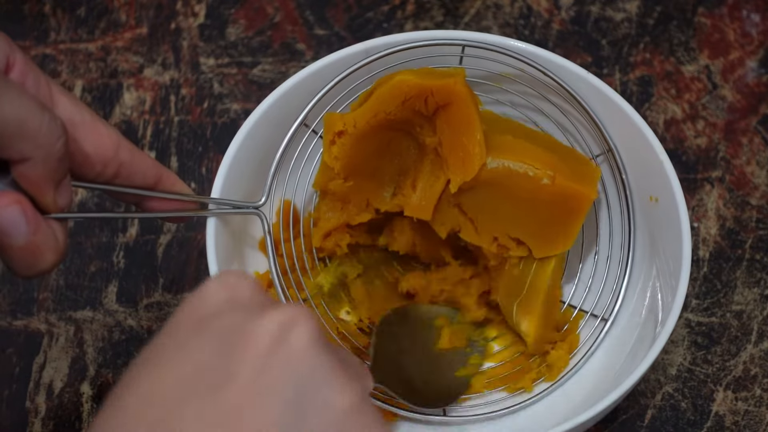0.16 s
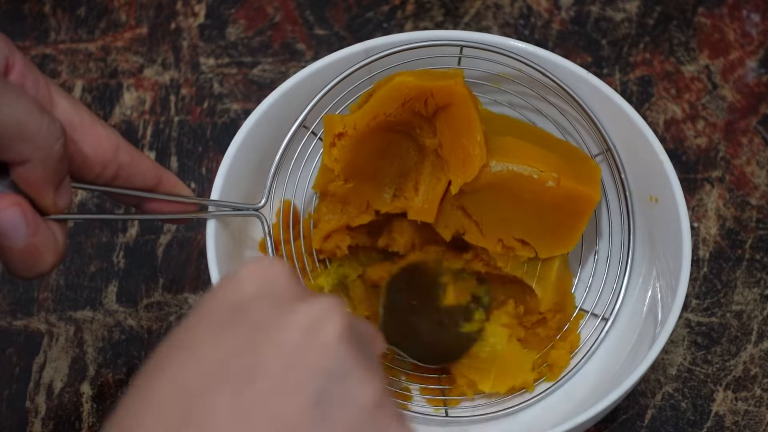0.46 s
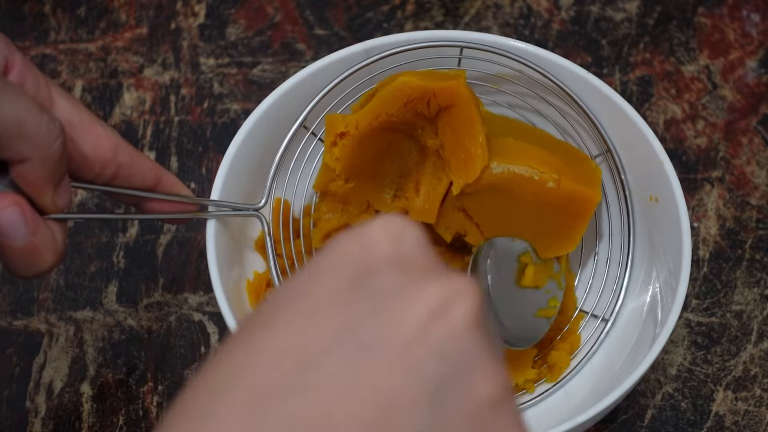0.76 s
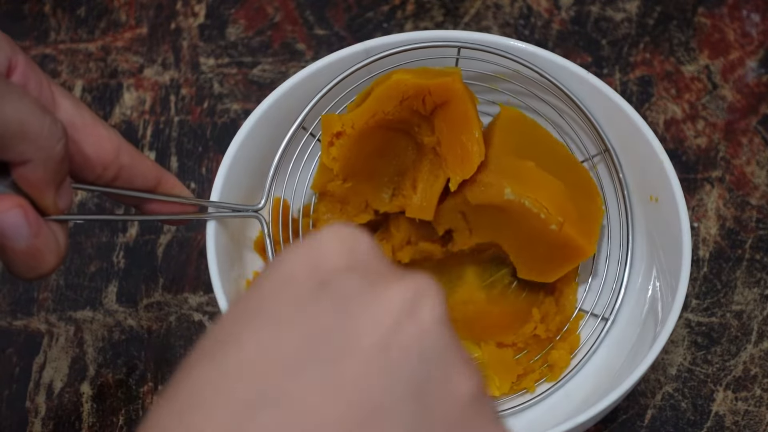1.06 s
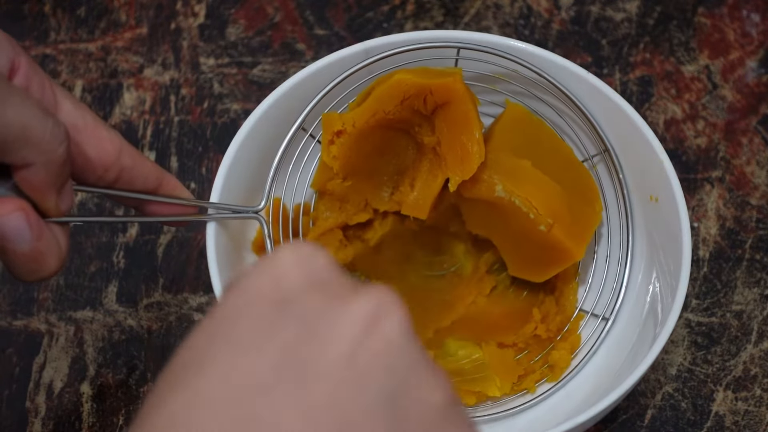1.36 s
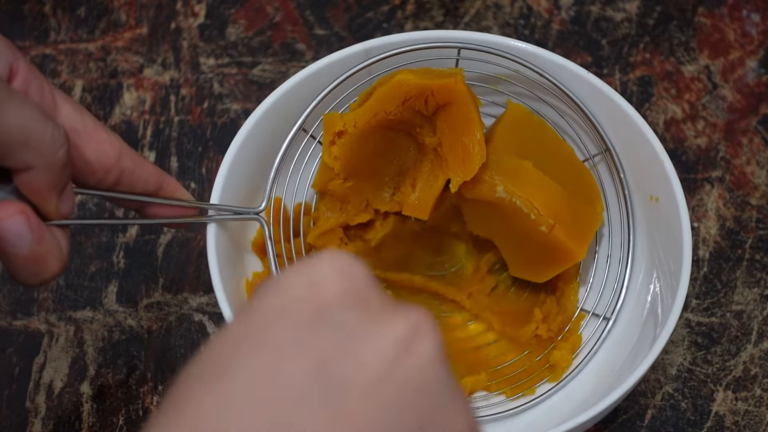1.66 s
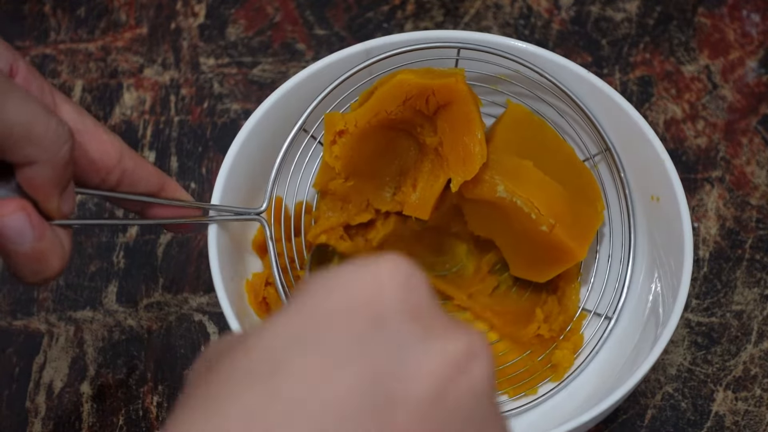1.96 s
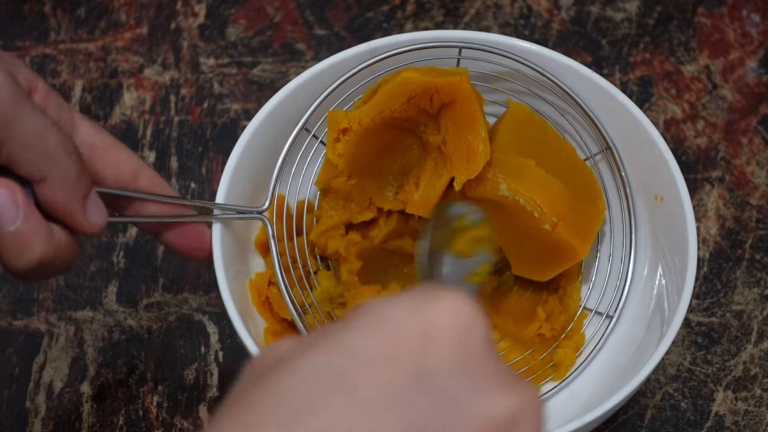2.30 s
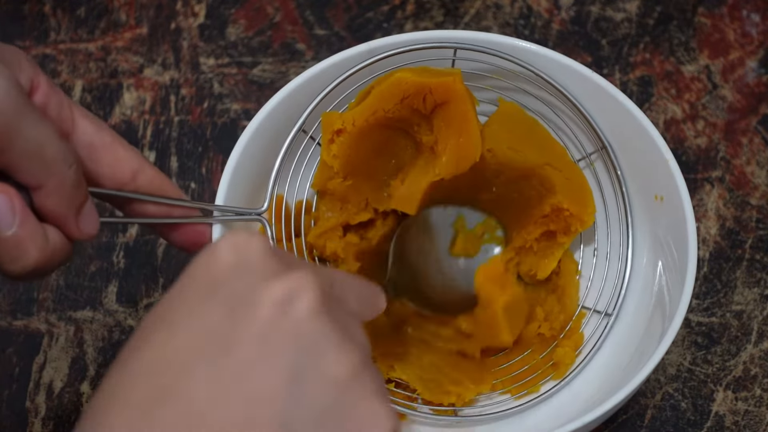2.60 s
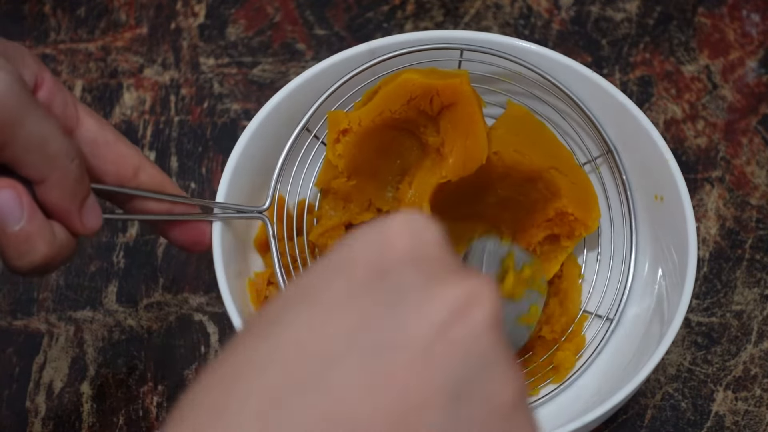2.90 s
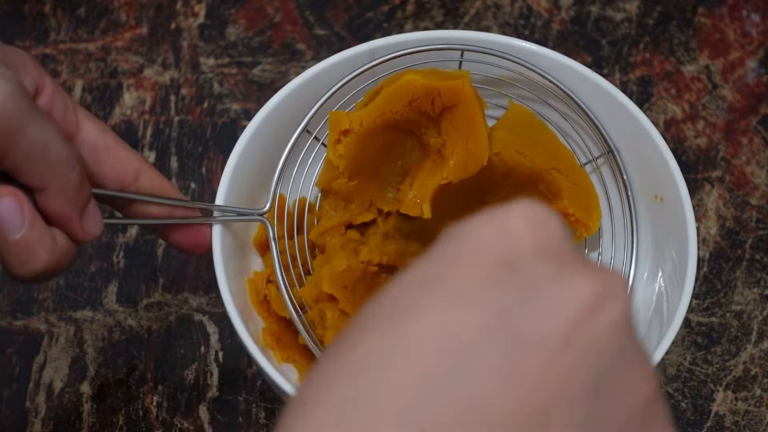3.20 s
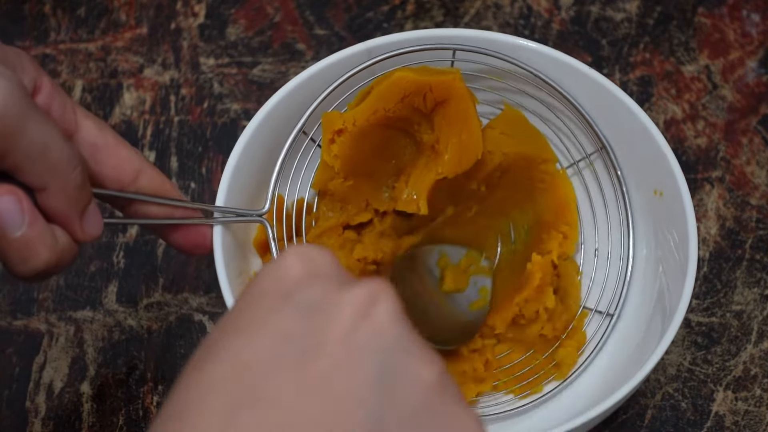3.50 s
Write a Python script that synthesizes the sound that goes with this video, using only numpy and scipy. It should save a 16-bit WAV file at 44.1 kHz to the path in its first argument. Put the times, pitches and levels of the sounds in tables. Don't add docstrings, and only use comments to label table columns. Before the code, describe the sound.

Spoon strokes scrape wires and wet pulp in irregular rhythm, with tiny ticks and short metallic pings. Clusters of hard clacks on the glazed bowl come mid-way, fading to softer rubs; close microphone in a lively small kitchen.

```python
import sys
import numpy as np
from scipy import signal
from scipy.io import wavfile

SR = 44100
rng = np.random.default_rng(int(sys.argv[2]) if len(sys.argv) > 2 else 0)


def ratio(d):
    e = np.asarray(d, float) / 20
    return 10 ** e


def unload_wav(signal):
    wavfile.write(
        sys.argv[1],
        SR,
        np.round(np.clip(np.atleast_2d(signal).T, -1, 1) * 32767).astype(np.int16),
    )


N = 160965

# (time [s], peak [dB], clack and bowl ring [dB], body [dB], crack centre [Hz])
KNOCK_HITS = [(1.271, -24.5, 6, -14, 4730), (1.5508, -17, 11, -2, 7000), (1.5533, -17, 3, -1.5, 9000),
              (1.556, -14.5, -6, -26, 4000), (1.566, -23, -1, -4, 3800), (1.57, -22, 2, -22, 5460),
              (1.589, -23.5, 0, -21, 6500), (1.598, -24, -5, -9, 3550), (1.835, -19, 0, -19, 6300),
              (1.844, -24, -21, -1, 4400), (1.85, -21.5, -7, -5, 6300), (1.855, -23, -4, -3, 4000),
              (1.86, -17, 4, -20, 5200), (1.868, -30, -13, -8, 4500), (1.878, -30.5, -4, -6, 4020),
              (1.986, -42.5, 1, 5.5, 3000), (2.123, -32, -19, -7, 6530), (2.1266, -26, 2, -5, 5400),
              (2.1287, -26.5, -17, -11.5, 5900), (2.1324, -18, 5, -8, 5200), (2.141, -25, -7, -3, 3950),
              (2.143, -20, -5, -20, 4800), (2.148, -21, -3, -18.5, 4700), (2.151, -28, -5, -30, 3250),
              (2.156, -24.5, -12, -31, 4250), (2.1654, -32, -14, -18, 4600), (2.563, -28.5, -4, -7.5, 3000),
              (2.631, -33.5, 1, -5, 3500), (3.365, -36.5, 8.5, -7, 3500), (3.388, -33.5, 8.5, -8, 3540),
              (3.428, -39, 10, 1.5, 3580), (3.499, -30, -3, -1, 4150), (3.518, -28.5, 2, -6.5, 3700),
              (3.554, -33.5, 1, -14, 4500)]
# (frequency [Hz], level [dB], T60 [s])
CLACK_MODES = [(3600, -6, .025), (5300, -7, .025), (7400, -8, .02), (9500, -9, .02)]
# (frequency [Hz], correlation [-1..1])
STEREO_LIKENESS = [(80, 1), (200, 0.36), (900, 0.4), (4000, 0.62), (14000, 0.37)]
BODY_CUT_HZ = 854


def at_hz(points, hz):
    curve_hz, value = np.transpose(points)
    return np.interp(np.log(hz), np.log(curve_hz), value)


def rms_one(x):
    return x / np.sqrt(np.mean(x ** 2) + 1e-20)


def drift(rate):
    r = np.exp(-80 * np.pi * rate / SR)
    noise = rng.standard_normal(N // 40 + 2002)
    slow = signal.lfilter([1], [1, -2 * r, r * r], noise)[2000:]
    return np.interp(np.arange(N) / 40, np.arange(len(slow)), rms_one(slow))


def ring(clicks, hz, t60):
    r = ratio(-60 / (t60 * SR))
    w = 2 * np.pi * hz / SR
    return signal.lfilter([0, np.sin(w)], [1, -2 * r * np.cos(w), r * r], clicks + 1e-18)


def band_pass(x, hz, octaves):
    edges = np.clip(hz * 2. ** np.array([-octaves, octaves]), 20, [.4 * SR, .45 * SR])
    return signal.sosfilt(signal.butter(2, edges, "band", fs=SR, output="sos"), x)


def high_pass(x, hz):
    return signal.sosfilt(signal.butter(4, hz, "high", fs=SR, output="sos"), x)


def add(out, s, piece):
    i = max(int(s * SR), 0)
    out[i:i + len(piece)] += piece[:len(out) - i]


def burst(noise, decay_s, hz, octaves):
    t = np.arange(len(noise)) / SR / decay_s
    envelope = np.exp(-t) * (1 - np.exp(-t / .3))
    spit = band_pass(noise * envelope, hz, octaves)
    return spit / np.abs(spit).max()


def grains(per_s, spread_db):
    sizes = ratio(spread_db * np.minimum(rng.exponential(1, N), 5))
    signs = rng.choice([-1, 1], N)
    return sizes * signs * (rng.random(N) < per_s / SR)


def stereo_bands(length, shape, alike):
    out = 0
    edges = 30 * 2 ** np.arange(0, 9.6, .5)
    white = rng.standard_normal((2, 2, length))
    for k, (low, top) in enumerate(zip(edges, edges[1:])):
        sos = signal.butter(2, [low, top], "band", fs=SR, output="sos")
        mid, side = signal.sosfilt(sos, white[k % 2])
        hz = np.sqrt(low * top)
        c = np.clip(alike(hz), -1, 1)
        out = out + shape(hz) * (np.sqrt(1 + c) * mid + np.sqrt(1 - c) * side * [[1], [-1]])
    return out


def knocks():
    # (frequency [Hz], level [dB], T60 [s])
    bowl_modes = [(824, -9, .2), (1192, -7, .12), (1502, -3, .14), (1685, -5, .12), (2680, -8, .12),
                  (3551, -6, .12), (5240, -4, .1), (5470, -3, .16), (9530, -14, .05)]
    clack_db, bowl_db, mode_scatter_db = -14, -31, 5.0
    cluster_share = .018
    s, db, ring_db, body_db, crack_hz = np.transpose(KNOCK_HITS)
    at = (s * SR).astype(int)
    grit, clack, bowl = np.zeros(N), np.zeros(N), np.zeros(N)
    cluster = [(hz * (1 + cluster_share * k), level_db - 3 * abs(k), t60)
               for hz, level_db, t60 in bowl_modes for k in (-1, 0, 1.3)]
    modes = CLACK_MODES + cluster
    scatter = mode_scatter_db * rng.standard_normal((len(s), len(modes)))

    for k, (hz, level_db, t60) in enumerate(modes):
        is_clack = k < len(CLACK_MODES)
        group_db = clack_db if is_clack else bowl_db
        clicks = np.zeros(N)
        clicks[at] = (-1) ** k * ratio(db + level_db + ring_db + group_db + scatter[:, k])
        add(clack if is_clack else bowl, 0, ring(clicks, hz, t60))

    for t, peak_db, dull_db, hz, noise in zip(s, db, body_db, crack_hz, rng.standard_normal((len(s), 1800))):
        crack = burst(noise[:600], decay_s=.002, hz=hz, octaves=0.52)
        body = burst(noise[600:], decay_s=0.0014, hz=1434, octaves=0.38)
        add(grit, t, ratio(peak_db - 3) * crack)
        add(grit, t, ratio(peak_db + dull_db) * body)
    rings = clack + bowl * ratio(5 * drift(45))
    return high_pass([grit, rings], BODY_CUT_HZ)


def ticks():
    # (time [s], peak [dB], centre [Hz], room share [dB])
    spits = [(0.0199, -31.5, 6200, 8), (0.3325, -26, 5600, 2), (0.4052, -35, 6800, 8),
             (0.4833, -28, 7000, 10.5), (0.533, -34, 6600, -3), (0.5737, -33, 8400, 9),
             (0.747, -29.5, 6800, 7), (0.835, -25.5, 10900, 1), (0.8863, -33.5, 6900, -3),
             (1.0355, -34, 6800, 7), (1.1015, -26, 6000, 1), (1.115, -31, 9900, 7), (1.2655, -36, 5940, -1),
             (1.3125, -27.5, 6200, -2), (1.752, -30.5, 4800, 5), (1.777, -28.5, 8300, 6),
             (1.7946, -31.5, 8600, 20), (2.1914, -35, 8500, -8), (2.4614, -32, 8000, -4),
             (2.4696, -43, 6750, -3), (2.659, -34, 7960, -14), (3.216, -29, 7500, 6),
             (3.469, -34.5, 6360, 16), (3.5408, -32.5, 7000, 2), (3.5978, -32, 9300, -6),
             (0.168, -35.5, 2230, -5), (0.5505, -31, 2930, 11.5), (0.6498, -30, 4830, 6),
             (0.916, -33, 5300, 11), (0.9215, -26.5, 3780, -1.5), (0.9389, -35, 1470, 3.5),
             (0.9466, -22.5, 4100, -21), (1.0134, -36, 2100, 5), (1.271, -18.5, 4200, -17),
             (1.6888, -33, 4050, 8), (2.2596, -33, 5160, -9), (2.2866, -37, 5000, 0),
             (2.6291, -31.5, 2210, 2), (2.6328, -28, 3380, -13), (2.667, -27.5, 4100, 0),
             (2.9714, -30.5, 5500, 6.5), (3.011, -30, 5000, 4.5), (3.265, -37, 1740, 6),
             (3.6454, -44, 4860, 6),
             (0.501, -31, 7000, -2), (0.5014, -42, 1680, -0.5), (0.515, -34, 9000, -10),
                   (1.908, -45, 6000, 2), (1.933, -38, 8600, 0), (1.96, -38, 12300, -5),
                   (2.047, -39, 6500, 10), (2.067, -45, 7500, 4), (2.092, -42, 6850, 0),
                   (2.769, -38, 4600, 11), (2.424, -47, 3910, 7), (2.521, -40, 3960, 6),
                   (2.619, -37, 6900, 0), (2.651, -46, 5000, 0), (2.6537, -35, 9500, -5),
                   (2.678, -39, 4500, -13), (2.732, -40.5, 7450, -11)]
    near, far = np.zeros(N), np.zeros(N)
    rows = spits
    for (s, db, hz, room_db), noise in zip(rows, rng.standard_normal((len(rows), 600))):
        spit = ratio(db) * burst(noise, decay_s=0.0015 * 4000 / hz, hz=hz, octaves=0.38)
        add(near, s, spit)
        add(far, s, ratio(min(room_db, 6)) * spit)
    return near, far


def pings():
    # (time [s], level [dB], frequency [Hz], swell [s], T60 [s])
    sung_notes = [(.6495, -39, 3900, .001, .03), (.6495, -39, 4620, .001, .03),
                  (.6495, -39, 5450, .001, .03), (.168, -49, 2420, .004, .3), (.552, -46, 2450, .025, 0.22),
                  (.547, -42, 3100, .004, 0.03), (1.338, -44, 2720, .01, 0.025),
                  (1.4, -57, 1290, .025, .15), (1.559, -49, 510, .02, 0.4), (1.556, -29, 3551, .003, .04),
                  (1.568, -34, 5470, .004, .3), (2.022, -49, 1500, .012, 0.25),
                  (2.563, -42, 7400, .001, .06), (2.563, -43, 5300, .001, .1),
                  (2.563, -45, 9500, .001, .04), (2.563, -46, 3550, .001, .12),
                  (2.563, -44, 2100, .001, .06), (2.972, -40, 4620, .001, .04),
                  (2.972, -40, 5450, .001, .04), (3.0, -60, 850, .05, 0.15), (3.11, -53, 1300, .13, .06)]
    pitch_wander, flutter_db = .012, 4.0
    out = np.zeros(N)
    t = np.arange(SR // 2) / SR
    waver = np.cumsum(1 + pitch_wander * drift(60)) / SR
    for s, db, hz, swell, t60 in sung_notes:
        clock = np.resize(waver[int(s * SR):], len(t))
        rise = np.minimum(t / swell, 1)
        decay = ratio(db - 60 * np.maximum(t - swell, 0) / t60)
        add(out, s, decay * rise * np.sin(2 * np.pi * hz * clock))
    return out * ratio(flutter_db * drift(70))


def rubs():
    # (time [s], length [s], level [dB], centre [Hz])
    strokes = [(0.165, 0.28, -42.5, 2680), (0.328, 0.23, -52, 4550), (0.481, 0.67, -48, 4250),
               (0.75, 0.32, -56.5, 5240), (0.917, 0.054, -40.5, 3550), (1.1, 0.052, -41.5, 3020),
               (1.267, 0.32, -45, 4300), (1.412, 0.064, -51.5, 2900), (1.547, .07, -38, 3200),
               (1.549, 0.13, -37, 11500), (1.845, 0.076, -34.5, 4730), (2.122, 0.066, -41.5, 4900),
               (2.173, 0.14, -43, 2900), (2.461, 0.13, -44.5, 7240), (2.622, 0.3, -49, 3360),
               (2.968, 0.11, -54.5, 5000), (3.083, 0.21, -52.5, 3000), (3.393, 0.13, -50, 1620),
               (3.489, 0.11, -46.5, 1700)]
    attack_s, release_s = 0.0017, 0.0086
    out = np.zeros(N)
    t = np.arange(N) / SR
    grit = rms_one(grains(per_s=6400, spread_db=2.5) * ratio(2.5 * drift(60)))
    ringing = sum(ratio(db) * ring(grit, hz, t60) for hz, db, t60 in CLACK_MODES)
    friction = rms_one(grit + 0.043 * rms_one(ringing))
    for s, length, db, hz in strokes:
        attack = np.clip((t - s) / attack_s, 0, 1)
        fade = np.exp(-3.07 * np.clip((t - s) / length, 0, 1))
        release = np.exp(-np.maximum(t - s - length, 0) / release_s)
        octaves = min(hz / 4000, 1.3)
        out += ratio(db) * attack * fade * release * rms_one(band_pass(friction, hz, octaves))
    return out


def squelch():
    pops = grains(per_s=180 * ratio(4.1 * drift(15)), spread_db=3.3)
    pitches = np.geomspace(1200, 12000, 14)
    dealt = rng.integers(0, 14, N)
    wet = sum(ring(pops * (dealt == k), hz, t60=5.0 / hz) for k, hz in enumerate(pitches))
    return ratio(-65) * rms_one(wet)


def counter():
    out = np.zeros(N)
    for (s, db, *_), noise in zip(KNOCK_HITS, rng.standard_normal((len(KNOCK_HITS), 9000))):
        add(out, s, ratio(db - 42.5) * burst(noise, decay_s=0.039, hz=252, octaves=1.0))
    return out


def kitchen(x):
    # (frequency [Hz], T60 [s])
    room_t60 = [(300, 1), (1000, 0.49), (3000, 0.89), (8000, 0.46), (15000, 0.33)]
    # (frequency [Hz], level [dB])
    room_colour = [(200, 5), (500, 3.5), (1500, 1.5), (2300, -1.5), (5000, -1), (10000, 0), (15000, 3.5)]
    room_db, onset_s = -3, 0.00043
    t = np.arange(SR) / SR

    def decay(hz):
        return ratio(at_hz(room_colour, hz) - 60 * t / at_hz(room_t60, hz))

    tail = stereo_bands(SR, decay, lambda hz: at_hz(STEREO_LIKENESS, hz))
    tail = tail * (1 - np.exp(-(t / onset_s) ** 2))
    tail = ratio(room_db) * tail / np.sqrt(np.sum(tail ** 2) / 2)
    return signal.fftconvolve(x[None], tail, axes=1)[:, :N]


def air():
    # (frequency [Hz], level [dB])
    air_spectrum = [(30, -33), (95, -5.5), (259, -13.5), (822, -3), (1100, -6), (3870, -2.5), (9460, -4.5),
                    (14500, -25.5), (16000, -7)]
    together = drift(2.5)

    def patchy(hz):
        return ratio(at_hz(air_spectrum, hz) + 0.67 * together + 2.46 * drift(10.7))

    return ratio(-52) * rms_one(stereo_bands(N, patchy, lambda hz: at_hz(STEREO_LIKENESS, hz)))


def ports(x, pan_db):
    panned = x * ratio(pan_db * np.array([[.5], [-.5]]))
    return panned + ratio(-7) * np.gradient(x) * [[1], [-1]]


def scene():
    grit, rings = knocks()
    near, far = ticks()
    pulp = high_pass(rubs() + squelch(), BODY_CUT_HZ)
    sung = pings()
    room = kitchen(grit + far + 1.24 * pulp + .45 * (rings + sung))
    bowl_side = ports(grit + rings, pan_db=-3)
    spoon_side = ports(near + pulp + sung, pan_db=-1.0)
    return bowl_side + spoon_side + room + counter() + air()


def roll_off(x):
    return signal.sosfilt(signal.butter(12, 16640, fs=SR, output="sos"), x)


def record(dry):
    top_cut = signal.cheby2(10, 50, 16650, fs=SR, output="sos")
    mix = signal.sosfilt(top_cut, high_pass(dry, 24))
    return roll_off(mix)


dry = scene()
out = record(dry)
unload_wav(out)
```